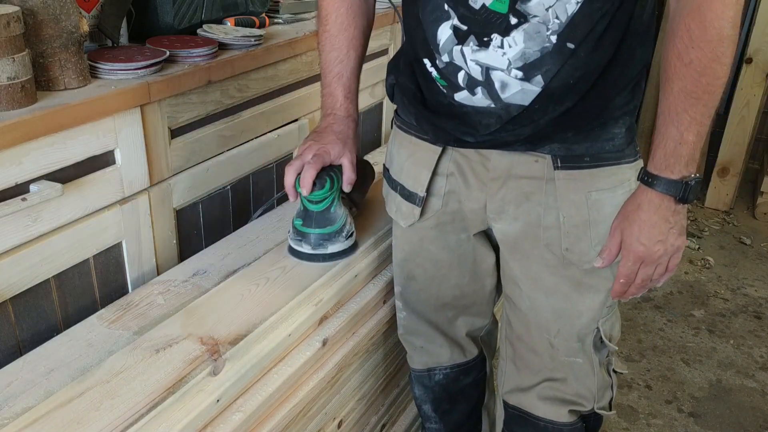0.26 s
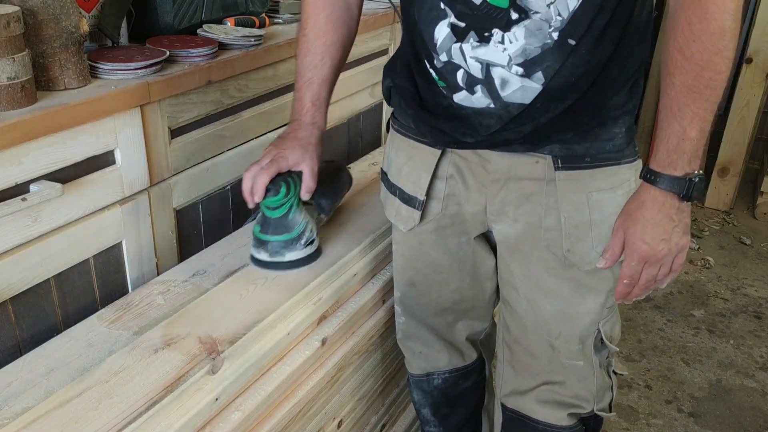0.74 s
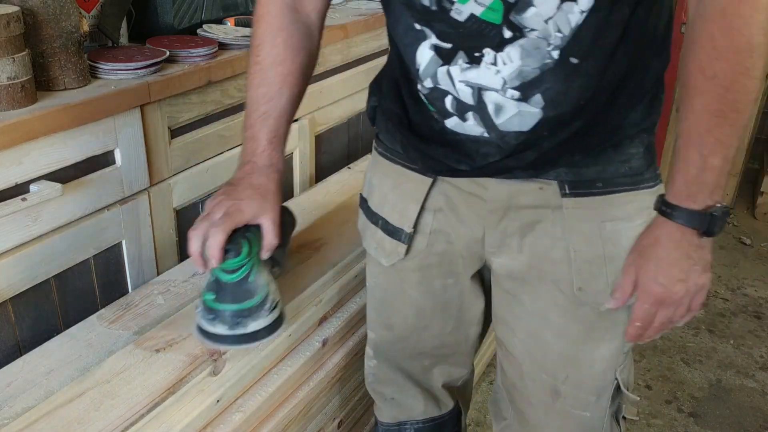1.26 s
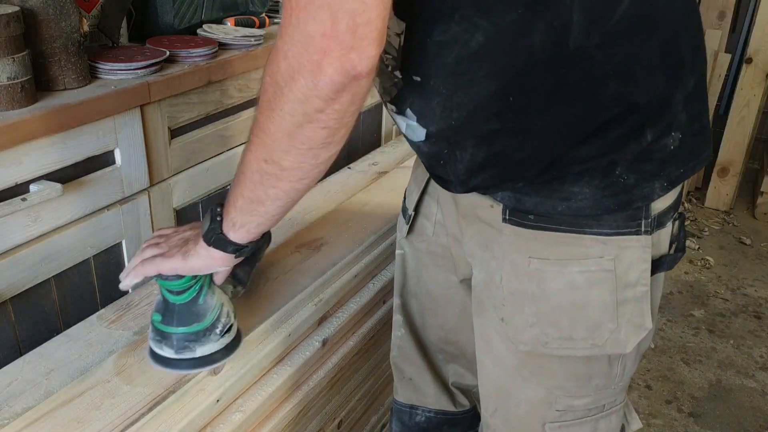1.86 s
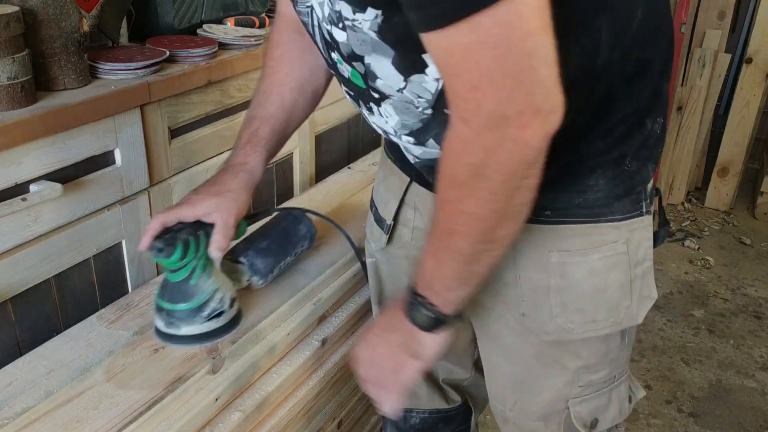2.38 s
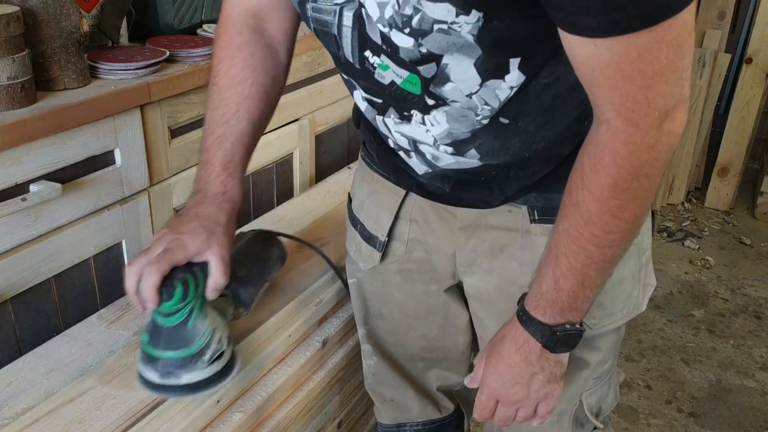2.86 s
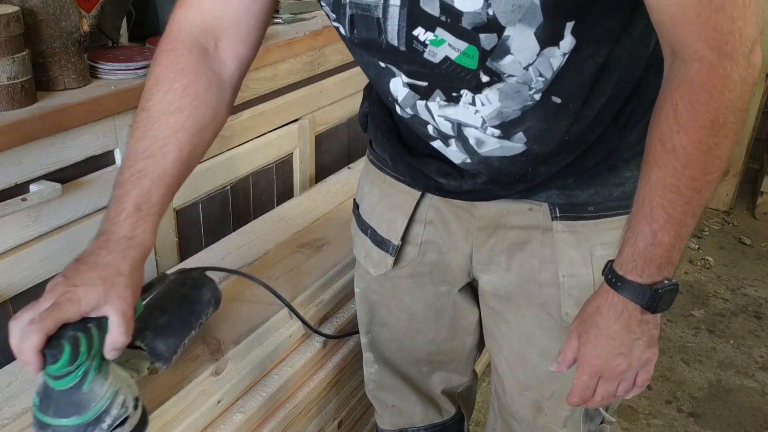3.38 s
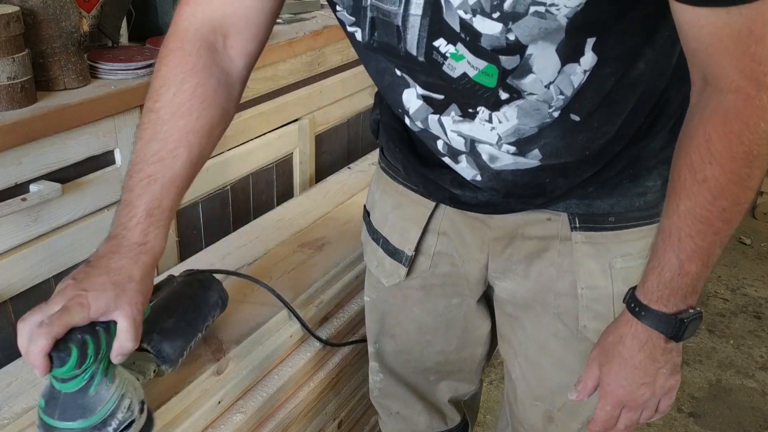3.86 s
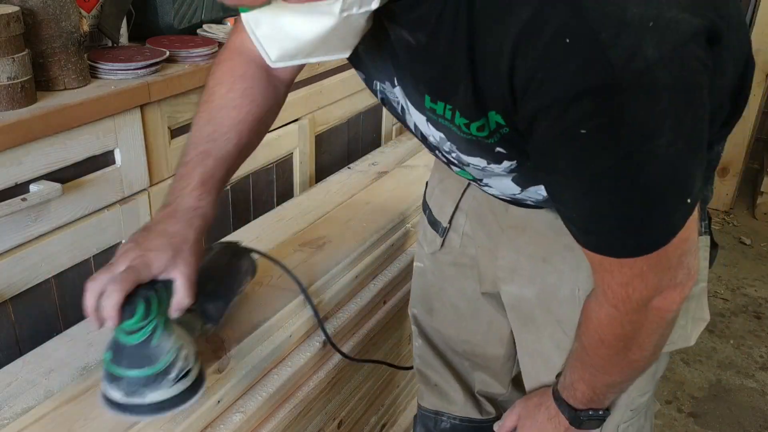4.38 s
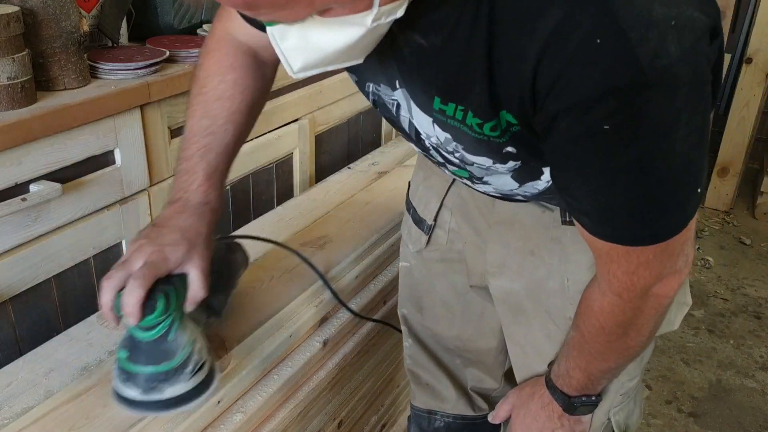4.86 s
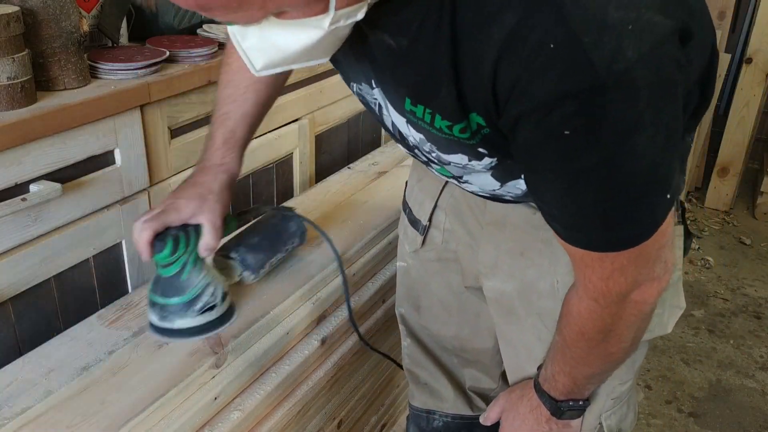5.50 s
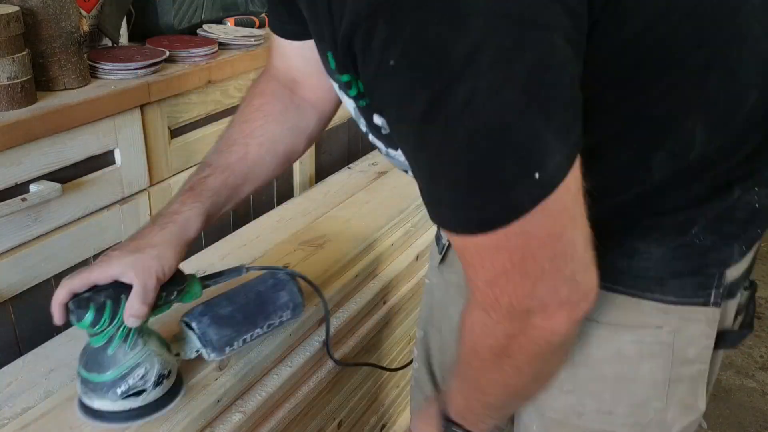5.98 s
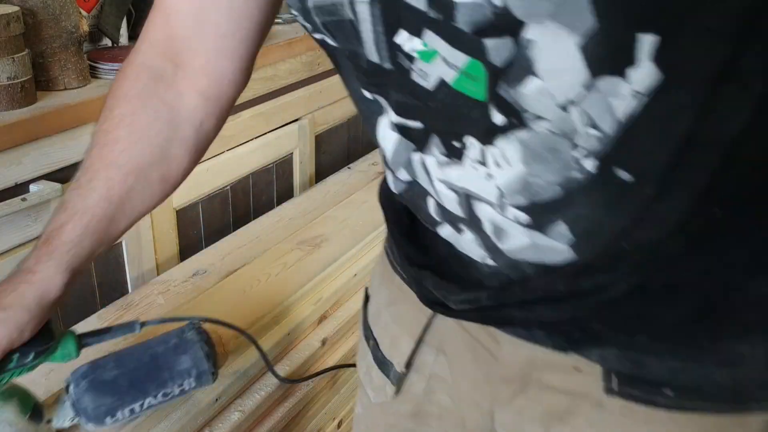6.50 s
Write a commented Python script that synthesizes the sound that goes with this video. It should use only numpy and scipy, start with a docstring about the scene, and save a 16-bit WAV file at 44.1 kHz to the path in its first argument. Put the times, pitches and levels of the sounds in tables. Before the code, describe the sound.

A handheld electric sander runs without a break on wooden boards in a workshop. Its steady, slightly fluttering motor whine sags a little under pressure, then rises again. Bright grit hiss and fan air surround it, with a faint low rumble from the boards. Close stereo microphones catch the tones swelling and fading as the tool moves through the room's reflections.

```python
"""In a workshop, a random orbital sander is pushed back and forth over wooden boards before a microphone pair.
Motor and fan whine on one stack of tones, sines that sag under load and flutter as the pad wobbles.
The tones swell and fade as the tool moves through the room's standing waves.
Shaped noise around them gives the rumble of the boards, the rush of fan air and the hiss of grit."""
import sys
import numpy as np
from scipy import signal
from scipy.fft import rfft, irfft
from scipy.io import wavfile
from scipy.ndimage import uniform_filter1d

SR = 44100
rng = np.random.default_rng(int(sys.argv[2]) if len(sys.argv) > 2 else 0)


def dump(signal):
    """Clip the signal to [-1, 1] and save it as 16-bit WAV at the path in sys.argv[1]."""
    limited = np.clip(np.atleast_2d(signal).T, -1, 1)
    pcm = np.round(limited * 32767).astype(np.int16)
    wavfile.write(sys.argv[1], SR, pcm)


N = 297234
TIME = np.arange(N) / SR  # s, every sample
HZ = np.fft.rfftfreq(N, 1 / SR)
TICKS = np.linspace(0, N / SR, 8192)  # s, coarse clock for everything that drifts


def gain_of(db):
    """Decibels to amplitude."""
    return 10 ** (np.asarray(db) / 20)


def evened(x):
    """Scales to rms 1."""
    return x / np.sqrt(np.mean(abs(x) ** 2) + 1e-30)


def curve(rows, at):
    """A time table, read at the given times."""
    return np.interp(at, *np.transpose(rows))


def read(points, at):
    """Joins points by straight lines on a logarithmic axis."""
    x, value = np.transpose(points)
    return np.interp(np.log(at + 1), np.log(x + 1), value)


def wander(rate):
    """Complex random drift of rms 1, one value a tick, up to about rate swings a second."""
    f = np.fft.fftfreq(len(TICKS), TICKS[1])
    a, b = rng.standard_normal((2, len(TICKS)))
    return evened(np.fft.ifft((a + 1j * b) / (1 + (f / rate) ** 2)))


def swing_of(rate):
    """Real drift for levels in dB, its dips allowed to go deeper than its peaks."""
    return np.clip(wander(rate).real, -2, 1)


# How alike the two microphones hear each frequency: (frequency_hz, likeness 0 to 1)
MICROPHONE_LIKENESS = [(60, 0.11), (300, 0.33), (700, 0.24), (1400, .93), (2200, .75), (3500, 0.36),
                       (5000, 0.32), (7500, 0.88), (9000, 0.045), (11000, 0.18), (11400, 0.92), (15500, 1)]
# Phase by which the left microphone leads the right: (frequency_hz, lead_radians)
LEFT_LEAD = [(60, -1.1), (2000, -0.29), (4200, -0.88), (5500, -1.6), (6300, -1.9), (7800, -1.72),
             (9000, -0.78), (11200, 0.32), (16000, 0.18)]


def pair(a, b, hz):
    """Two unrelated signals become left and right, as alike as the microphones hear this frequency."""
    same = np.clip(read(MICROPHONE_LIKENESS, hz), 0, 1)
    right = same * a + np.sqrt(1 - same ** 2) * b
    return np.array([a, right * np.exp(-1j * read(LEFT_LEAD, hz))])


def tone(envelope, turns):
    """A sine that follows turns, with a complex envelope for each channel."""
    carrier = np.exp(2j * np.pi * turns)
    return np.sqrt(2) * np.array([(np.interp(TIME, TICKS, e) * carrier).real for e in envelope])


# Pitch of the whine, sagging when the hand presses down: (start_s, pitch_hz)
WHINE_PITCH = [(0.0, 837.7), (0.08, 833.7), (0.82, 841.7), (1.1, 828.7), (1.26, 834.1), (1.42, 817.5),
               (1.58, 822.3), (1.78, 846.1), (2.1, 862.1), (2.4, 863), (2.64, 841.4), (3.1, 809.3),
               (3.32, 828.4), (3.58, 814.4), (3.74, 826.2), (3.94, 804.3), (4.2, 798.8), (4.32, 810.1),
               (5.02, 814.4), (5.26, 826.8), (5.54, 815.6), (5.98, 844.7), (6.28, 834.6), (6.72, 849)]


def speed(at):
    """Pitch of the whine, and how far the load has pulled it below its mean, in Hz."""
    hz = curve(WHINE_PITCH, at)
    return hz, hz.mean() - hz


def rotation(jitter=0.00046, jitter_rate=14):
    """Cycles of the whine so far; the grit catches and makes the speed tremble."""
    hz, _ = speed(TIME)
    tremble = np.interp(TIME, TICKS, wander(jitter_rate).real)
    return np.cumsum(hz * (1 + jitter * tremble)) / SR


# Side tones made by the pad's wobble: (pitch_multiple, level_db against its tone)
WOBBLE_SIDE_TONES = [(1, -27.5), (2, -12.5), (3, -6.5), (4, -8.5), (5, -3.5), (6, -1.5), (7, 0.5), (9, -8),
                     (19, -18)]


def roughness(k, turns, skirt_db, wobble_ratio=0.073, side_rate=5.4, skirt_rate=45, second_db=-12):
    """What surrounds tone k: side tones one and two wobbles below it, and a skirt of turbulence."""
    wobble = np.exp(-2j * np.pi * wobble_ratio * np.interp(TICKS, TIME, turns))
    first_side = wobble * wander(side_rate * k)
    second_side = gain_of(second_db) * wobble ** 2 * wander(side_rate * k)
    skirt = gain_of(skirt_db) * wander(skirt_rate * np.sqrt(k))
    return gain_of(read(WOBBLE_SIDE_TONES, k)) * (first_side + second_side) + skirt


# Standing-wave swells of the three strong tones, before trim and ripple: (start_s, level_db)
FIRST_TONE_LEVEL = [(0.0, -58), (0.09, -75), (0.36, -55), (0.5, -67.5), (0.74, -55.0), (0.81, -61.5),
                    (1.25, -59.0), (1.29, -70), (1.38, -52.5), (1.59, -58.5), (2.39, -51), (2.53, -60),
                    (2.64, -54.5), (2.71, -63.0), (2.81, -56.0), (2.87, -71.5), (2.99, -55.0),
                    (3.19, -57.5), (3.31, -67.5), (3.43, -55.5), (3.75, -62), (3.88, -54.5), (4.37, -55.0),
                    (4.89, -61), (5.01, -52.0), (5.16, -59.0), (5.64, -55.5), (5.89, -62.5), (6.25, -61.0),
                    (6.31, -80), (6.44, -59.5), (6.49, -70), (6.73, -52.5)]
SECOND_TONE_LEVEL = [(0.0, -60), (0.24, -51.0), (0.34, -65.5), (0.65, -52.5), (0.79, -66.5), (1.14, -50.5),
                     (1.18, -59), (1.46, -50.5), (1.67, -52.0), (1.73, -60.5), (2.5, -63), (2.53, -57.5),
                     (2.83, -50), (2.86, -62.5), (3.22, -49), (3.26, -68.5), (3.45, -60.5), (3.54, -50),
                     (3.62, -47.5), (3.72, -73.5), (3.8, -55.5), (4.1, -59), (4.19, -49.5), (4.36, -67.5),
                     (4.5, -55), (4.6, -63.5), (4.66, -55), (4.89, -54), (4.97, -67.5), (5.06, -56.0),
                     (5.31, -70.5), (5.65, -56.5), (5.68, -75), (5.8, -58.0), (6.27, -58), (6.3, -67.5),
                     (6.69, -63), (6.73, -66)]
THIRD_TONE_LEVEL = [(0.0, -67.5), (0.06, -65), (1.44, -66.0), (1.6, -60), (2.16, -66), (2.33, -58.5),
                    (2.48, -69.5), (3.41, -61.5), (3.46, -72.5), (3.6, -55), (3.86, -67.5), (4.83, -61.0),
                    (5.01, -71.5), (5.08, -57), (5.86, -60.0), (5.91, -71), (6.73, -64)]
# Character of those tones, a row each: (trim_db, ripple_db, turbulent skirt_db, shimmer_share,
# left-right difference_db against the tone, difference_phase_radians, phase_swing_radians)
STRONG_TONES = [(-0.5, 2.17, -33.5, 0.034, -4, -0.77, 0.43), (-0.5, 4.8, -25, 0.094, -12.5, -1.6, .9),
                (-1, 4.5, -16, 0.22, -3, -0.88, 1.2)]
# Stereo width; for a while the whine closes in to the middle. The dB are divided by
# the tone's number, so the first tone closes most: (start_s, width_db)
WHINE_WIDTH = [(0, -3.5), (1.25, -3), (1.48, 3.5), (1.85, -9), (2.38, -15.5), (2.65, -0.5), (6.74, -0.3)]


def low_whine(turns, ripple_rate=8, swing_rate=4, side_follow=.05, side_ripple_db=2, spin=.1, spin_ratio=0.029):
    """Three strong tones levelled by standing waves; the microphones' difference hardly fades, so nodes sound wide."""
    pitch = speed(TICKS)[0].mean()
    # the disc turns far slower than the motor
    disc = np.exp(2j * np.pi * spin_ratio * np.interp(TICKS, TIME, turns))
    out = np.zeros((2, N))
    for i, levels in enumerate((FIRST_TONE_LEVEL, SECOND_TONE_LEVEL, THIRD_TONE_LEVEL)):
        trim_db, ripple_db, skirt_db, shimmer, side_db, side_phase, swing = STRONG_TONES[i]
        k = i + 1
        direct = gain_of(curve(levels, TICKS) + trim_db)
        # over 1 near a node, where small moves change the level most
        node = np.sqrt(direct.mean() / direct)
        middle = direct * gain_of(ripple_db * node * swing_of(ripple_rate))

        width_db = side_db + curve(WHINE_WIDTH, TICKS) / k
        width_db = width_db + side_ripple_db * np.sqrt(k) * swing_of(swing_rate)
        side_level = gain_of(width_db) * direct.mean() * node ** (-2 * side_follow)
        side = side_level * np.exp(1j * (side_phase + swing * wander(swing_rate).real))
        ears = np.array([middle + side, middle - side])

        throb = 1 + spin * np.sqrt(k) * (disc * wander(12.0)).real
        # the moving tool keeps changing its distance
        path = np.exp(1j * np.sqrt(k) * wander(2.5).real)
        a, b = (roughness(k, turns, skirt_db) + shimmer * wander(22) for _ in range(2))
        rough = pair(a, b, k * pitch)
        # scattered sound fills the nodes
        out += tone(path * (throb * ears + direct * node * rough), k * turns)
    return out


STROKE_S = 0.57  # one push and pull of the hand


def press():
    """The part of the sag that comes and goes within one stroke, in Hz, one value a tick."""
    _, sag = speed(TICKS)
    return sag - uniform_filter1d(sag, max(1, round(STROKE_S / TICKS[1])))


# Higher tones, a row each from the fourth multiple of the pitch up, before the shared swell:
# (level_db, load_db gained per Hz of sag, turbulent skirt_db against the tone)
HIGHER_TONES = [(-58.5, 0, -11), (-61, 0, -2.5), (-61.5, 0, 0.5), (-62.5, 0.11, -0.5), (-65.5, 0.17, -1.5),
                (-64.5, -0.0051, 2), (-65, 0.1441, 0.5), (-65, 0.0319, 1), (-65, -0.02, -7), (-69, 0, -3.5),
                (-68.5, 0.0254, -2.5), (-68.5, 0, -4), (-68, -0.0963, -4.5), (-67.5, 0.09, -4),
                (-69.5, 0.0158, -3), (-73, 0, -2.5)]


def high_whine(turns, level_db=0, fade=1.1, fade_rate=12, flare_db=2.0, flare_rate=6,
               together_db=2.02, together_rate=6, press_db_per_hz=0.0126):
    """The higher tones flare and fade among reflections, singly and together, and swell with each press."""
    hz, sag = speed(TICKS)
    swell_db = level_db + press_db_per_hz * press() + together_db * wander(together_rate).real
    out = np.zeros((2, N))
    for i, (db, load_db, skirt_db) in enumerate(HIGHER_TONES):
        k = len(STRONG_TONES) + 1 + i
        fade_share = fade * np.sqrt(k / len(HIGHER_TONES))

        def arrival():
            """A steady part of drifting phase, a fading reflected part, and roughness."""
            steady = np.exp(1j * np.angle(wander(1.7)))
            return steady + fade_share * wander(fade_rate) + roughness(k, turns, skirt_db)

        ears = pair(arrival(), arrival(), k * hz.mean())
        flare = gain_of(flare_db * swing_of(flare_rate))
        out += tone(gain_of(swell_db + db + load_db * sag) * evened(flare * ears), k * turns)
    return out


# Faint tones of the bearings and housing: (pitch_multiple, level_db, load_db gained per Hz of sag)
BEARING_TONES = [(.6, -101, 0.28), (1.233, -88.5, -0.54), (1.29, -89, 0), (2.585, -85, 0), (3.49, -79.5, 0),
                 (11.51, -77.5, 0), (12.49, -76.5, 0)]


def bearings(turns):
    """Thin unsteady tones between the main ones, locked to the motor's speed."""
    hz, sag = speed(TICKS)
    out = np.zeros((2, N))
    for k, db, load_db in BEARING_TONES:
        ears = pair(wander(6.2), wander(3.3), k * hz.mean())
        out += tone(gain_of(db + load_db * sag) * ears, k * turns)
    return out


def noise(spectrum):
    """Stereo noise of rms 1 with the given spectrum."""
    a, b = rfft(rng.standard_normal((2, N)))
    return evened(irfft(pair(a, b, HZ) * gain_of(read(spectrum, HZ)), N))


def mottled(x, patch_db, drift_db, size=512):
    """Uneven grain makes brief patches in a noise; moving reflections make slower, narrower ones."""
    overlap = size - size // 4
    z = signal.stft(x, SR, nperseg=size, noverlap=overlap)[2]

    def field(frames_count, bins_count):
        """Random level map of rms 1, smoothed over time frames and frequency bins."""
        draw = rng.standard_normal(z.shape[:0:-1])
        over_time = uniform_filter1d(draw, frames_count, axis=0)
        return evened(uniform_filter1d(over_time, bins_count, axis=1)).T

    patches = patch_db * field(frames_count=7, bins_count=12)
    drifts = drift_db * field(frames_count=35, bins_count=6)
    z = z * gain_of(patches + drifts)
    return evened(signal.istft(z, SR, nperseg=size, noverlap=overlap)[1][:, :N])


# Spectral shapes of the board rumble, fan air and grit hiss: (frequency_hz, relative density_db per Hz)
BOARD_RUMBLE = [(20, -20), (220, -23.5), (340, -21.5), (440, -3.5), (500, 1.5), (560, 5), (700, 4.5),
                (1000, -6), (1600, -37)]
FAN_AIR = [(400, -44.5), (700, -12), (900, -0.5), (1100, -2.5), (1400, -0.5), (1750, -5.5), (1900, -8.5),
           (2200, -1.5), (2750, 0), (3300, 8.5), (4500, -7), (8000, -29.5)]
GRIT_SCRAPE = [(1600, -54.5), (2700, -16), (3600, -3.5), (4500, -5), (5300, -3.5), (6200, -3), (7600, -0.5),
               (9000, -2.5), (10500, -4), (11400, -2), (12300, -2.5), (14200, -5.5), (15000, -6.5),
               (16500, -2.5)]


def sanding(turns, boards_db=-94, air_db=-63.5, scrape_db=-51.5, boards_db_per_hz=0.18, boards_follow=0.72,
            air_db_per_hz=-0.0815, scrape_db_per_hz=-0.055, chop=0.3):
    """Boards rumble with load and first tone; air and grit hiss grow with speed, grit chopped at the whine's pitch."""
    _, sag = speed(TIME)
    shake_db = curve(FIRST_TONE_LEVEL, TIME)
    grit_level = gain_of(scrape_db + scrape_db_per_hz * sag)
    grit = grit_level * mottled(noise(GRIT_SCRAPE), patch_db=2.26, drift_db=0.5)
    air_level = gain_of(air_db + air_db_per_hz * sag)
    rush = air_level * mottled(noise(FAN_AIR), patch_db=1.76, drift_db=1.5)
    rumble_db = boards_db + boards_db_per_hz * sag + boards_follow * (shake_db - shake_db.mean())
    rumble = gain_of(rumble_db) * noise(BOARD_RUMBLE)
    return grit * (1 + chop * np.cos(2 * np.pi * turns)) + rush + rumble


def scene():
    """One motor drives every layer."""
    turns = rotation()
    return low_whine(turns) + high_whine(turns) + bearings(turns) + sanding(turns)


EDGE_HZ = 15760  # top of the recorder's band


def record(dry):
    """The recorder's band limit, a steep low-pass filter."""
    taps = signal.firwin(1023, EDGE_HZ, window=("kaiser", 9), fs=SR)
    return signal.oaconvolve(dry, taps[None], "same")


dry = scene()
out = record(dry)
dump(out)
```